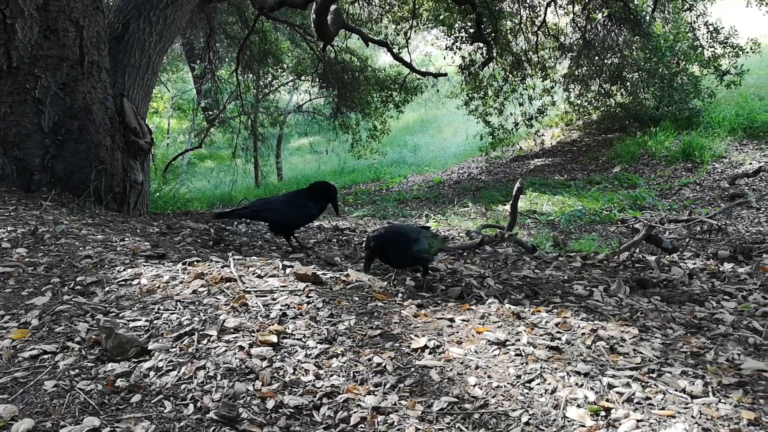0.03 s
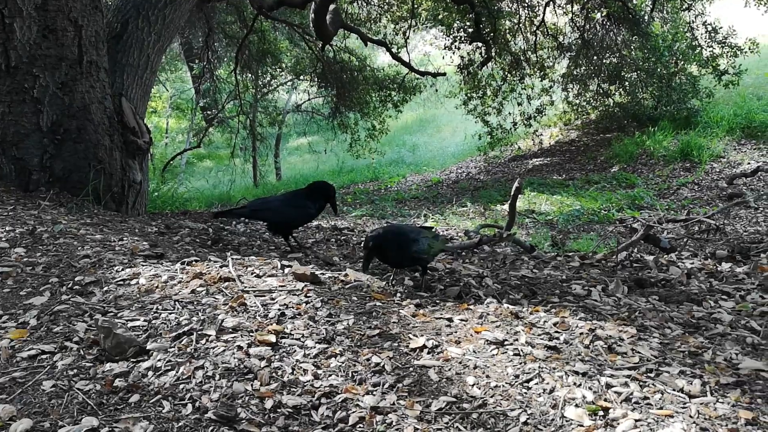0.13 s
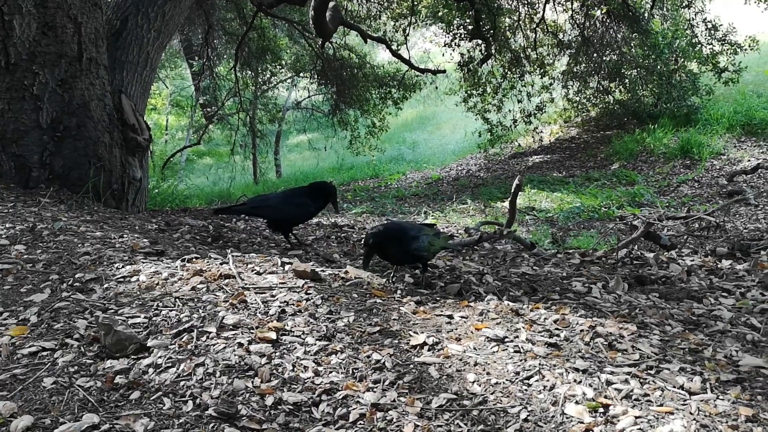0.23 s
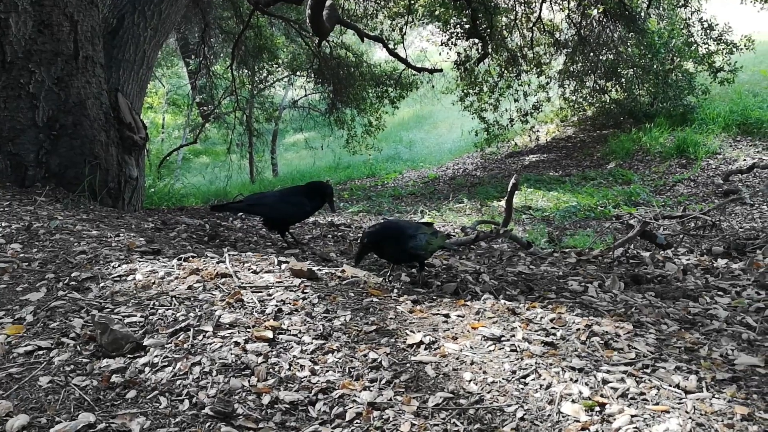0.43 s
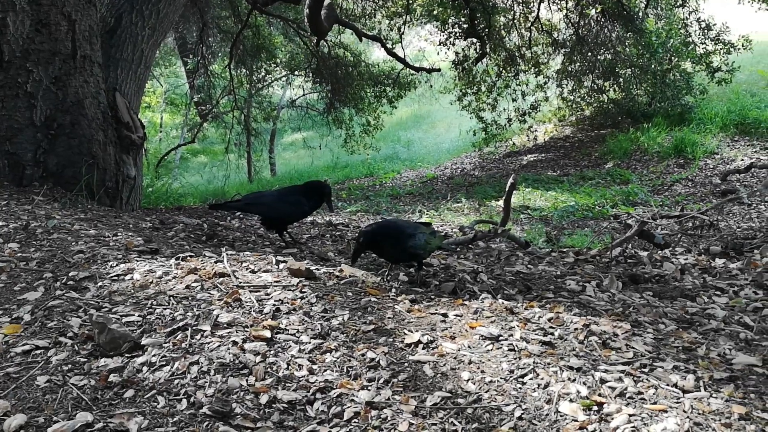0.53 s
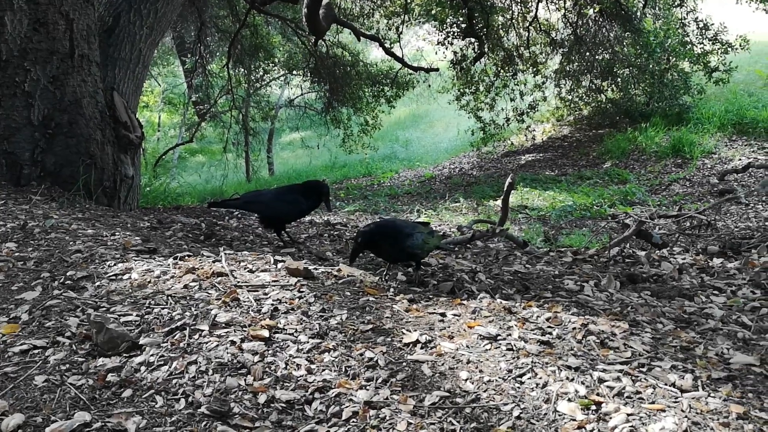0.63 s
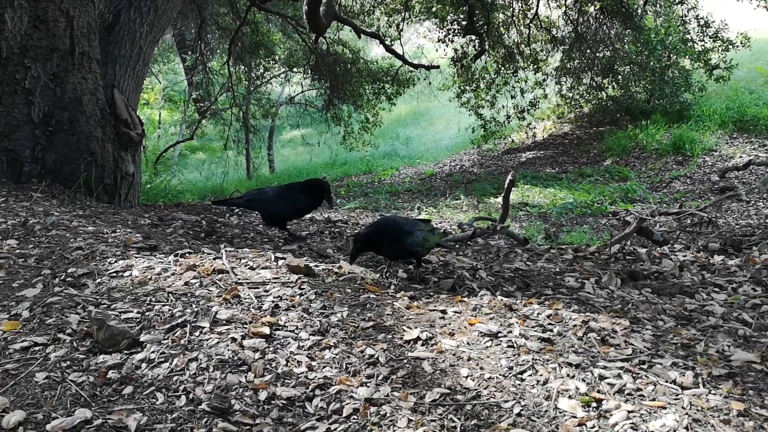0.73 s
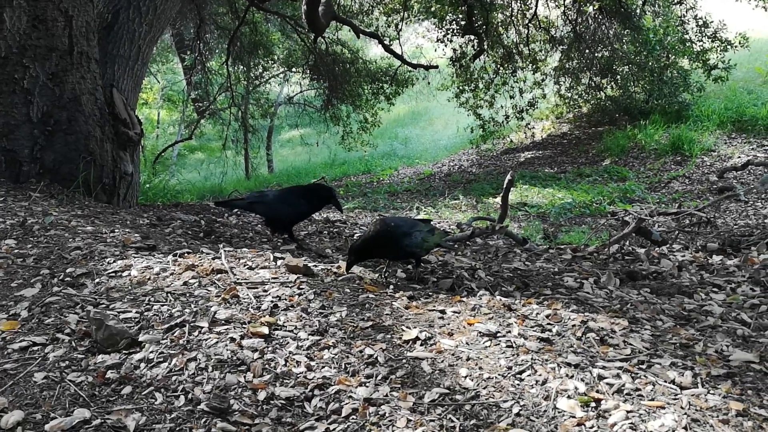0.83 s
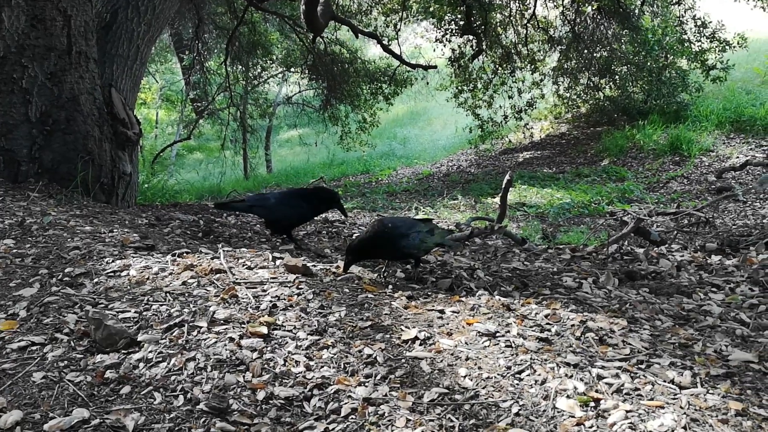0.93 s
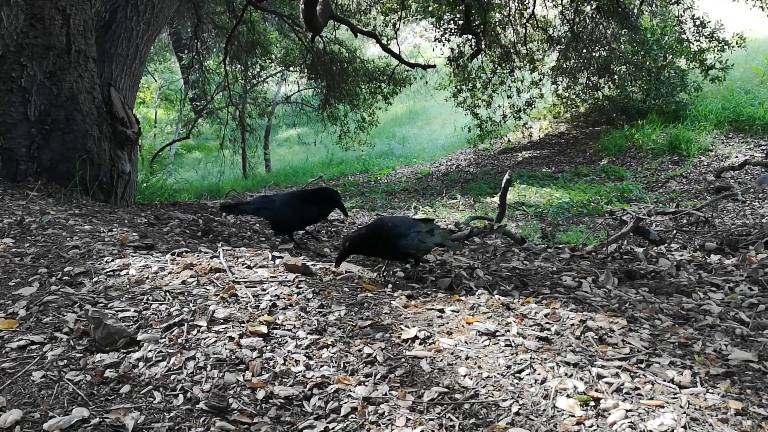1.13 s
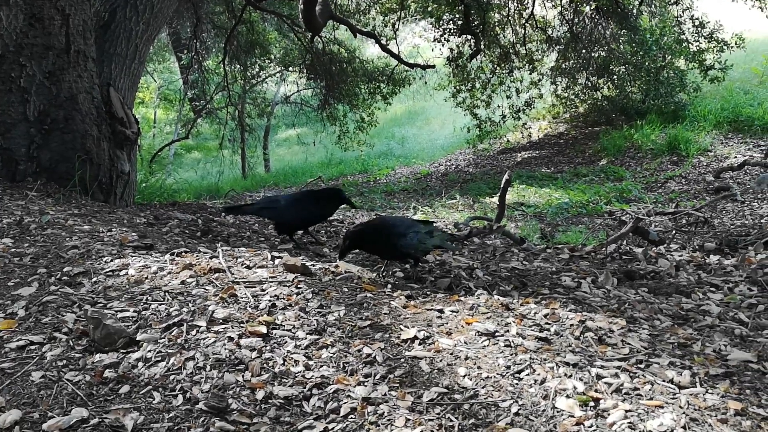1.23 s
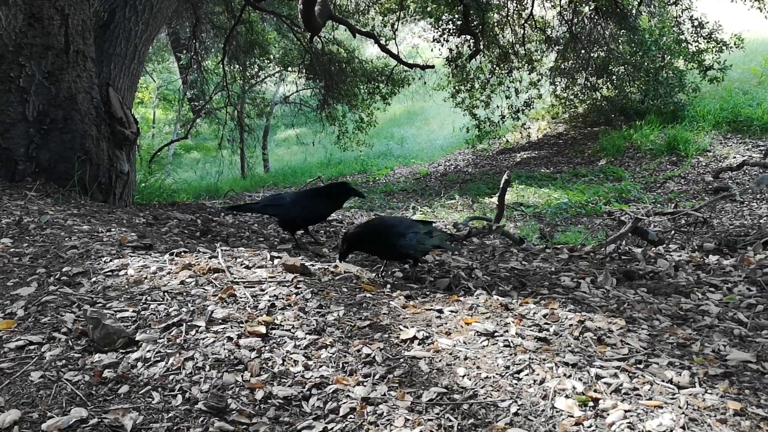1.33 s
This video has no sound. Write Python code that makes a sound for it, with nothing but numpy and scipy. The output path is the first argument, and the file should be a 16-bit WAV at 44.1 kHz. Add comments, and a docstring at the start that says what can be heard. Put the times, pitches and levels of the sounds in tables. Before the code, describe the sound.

Dry leaves rustle and crackle as crows forage, over a low wind rumble.

```python
"""First you hear open-air hiss and wind bumping the microphone.
At a cut, with a dull tick, this windy background switches to a quieter one.
Then come short, crackling rustles with sharp snaps: two crows search the dry leaves under a tree,
a few metres away. Their beaks and feet sweep the litter, crack single leaves and knock on twigs.
The ground and trees scatter these sounds, while a low wind rumble and a faint hum lie underneath."""
import sys
import numpy as np
from scipy import signal
from scipy.fft import rfft, irfft
from scipy.io import wavfile
from scipy.ndimage import uniform_filter1d

SR = 44100
rng = np.random.default_rng(int(sys.argv[2]) if len(sys.argv) > 2 else 0)


def generate_wav(signal):
    """Clip the signal to [-1, 1] and save it as 16-bit WAV at the path in sys.argv[1]."""
    frames = np.transpose(np.atleast_2d(signal))
    scaled = np.clip(frames, -1, 1) * 32767
    pcm = np.round(scaled).astype(np.int16)
    wavfile.write(sys.argv[1], SR, pcm)


N = 61739
TIME = np.arange(N) / SR

# strokes through the leaves (start/s, rise/s, fall/s, level/dB, crunch compared with rustle/dB)
STROKES = [(0.456, 0.0082, 0.012, -59, -14), (.520, 0.0012, 0.0056, -60, -28),
           (.575, 0.056, 0.026, -72.5, -14), (0.772, 0.028, 0.055, -64, -9.5),
           (.860, 0.0055, 0.028, -65.5, 0.5), (.945, 0.0073, 0.096, -73.5, -24),
           (1.094, 0.0026, .008, -65, -15.5), (1.172, 0.0027, 0.018, -59.5, -18),
           (1.176, 0.04, 0.034, -60.5, -15), (1.205, 0.028, 0.028, -62.5, -14)]
# tone of the rustle on top and of the crunch below (f/Hz, level/dB)
RUSTLE_TONE = [(400, -29), (1000, -20), (2400, -7.5), (3300, -19.5), (4400, -7), (6000, -7), (7400, -2),
               (8200, -2), (9500, -1.5), (10500, -10), (11700, -18), (14500, -32), (16000, -38.5)]
CRUNCH_TONE = [(400, -14), (1200, -7), (2000, -3), (2700, 4), (3400, -8), (4500, 2.5), (6000, -3),
               (11000, -30)]
def leaf_sweeps():
    """Leaves slide over each other with each stroke; deep strokes crunch the litter below."""
    top_power, deep_power = np.zeros((2, N))
    for start, rise, fall, db, crunch_db in STROKES:
        t = TIME - start
        stroke = amp(db) * np.clip(t / rise, 0, 1) * np.exp(-np.maximum(t - rise, 0) / fall)
        top_power += stroke ** 2
        deep_power += (stroke * amp(crunch_db)) ** 2
    return crackle(top_power, RUSTLE_TONE) + crackle(deep_power, CRUNCH_TONE)


def crackle(power, tone, clicks_per_s=5000, spread_db=4.2):
    """Rubbing leaves make thousands of tiny clicks of uneven size."""
    sizes = amp(spread_db * np.minimum(rng.exponential(1, (3, N)), 4))
    clicks = sizes * rng.choice([-1, 1], (3, N))
    clicks *= rng.random((3, N)) < clicks_per_s / SR
    streams = [colour(unit_level(row) * np.sqrt(power), tone) for row in clicks]
    return two_ears(*streams, shared=0.41)


# leaves cracking (t/s, level/dB, ring f/Hz, length/s, left minus right/dB, crack compared with ring/dB)
LEAF_SNAPS = [(.4706, -53.5, 8900, 0.00084, 9, -6), (.4712, -54.5, 6260, 0.0013, 7, -17),
              (0.4764, -56.5, 8200, 0.0009, -17, -20), (0.4808, -60, 7300, 0.0023, -14, -5),
              (0.4947, -68, 7870, 0.00089, -13, -8), (.5225, -65, 5700, 0.0027, -13, -10),
              (.5390, -66.5, 7940, 0.0015, -12, -3), (0.572, -55.5, 8200, 0.00079, 1.5, -12),
              (0.623, -62, 8300, 0.0034, -3, -3), (0.6405, -62, 7100, 0.0006, -9, -14),
              (.6930, -64, 7600, 0.0011, -6, -4), (0.7642, -58.5, 7540, 0.0031, -5, -2.5),
              (0.769, -60, 8700, 0.0012, -5, -2), (0.777, -62, 7160, 0.0013, -5, -3),
              (.790, -62, 7800, .0015, -6, -11), (0.7973, -55, 9450, 0.0018, 1, -6),
              (.8085, -54, 9700, 0.00086, 1, 14), (.8125, -62, 4970, 0.0015, -12, -9),
              (.8300, -43.5, 7800, 0.0013, -4, -5.5), (0.8313, -49, 9940, 0.0018, -4, -19),
              (0.8564, -57, 8870, 0.00063, 12, 12), (.8624, -43.5, 9400, 0.0011, -3.5, 4.5),
              (0.8647, -53, 7500, 0.0018, 3.5, -14), (0.951, -62, 4960, 0.0016, 4, -8),
              (1.098, -63, 8800, 0.0016, -9, -2), (1.1265, -62.5, 4460, 0.0015, -1.5, -3.5),
              (1.158, -67, 8500, .0008, 0, -6), (1.1686, -54, 6900, 0.00052, -2, -1),
              (1.1735, -56, 7100, 0.0019, -6, -16), (1.2125, -55, 7700, 0.0015, 5, -13),
              (1.2215, -52.5, 7500, 0.0011, -12, -21), (1.232, -54.5, 7800, .0015, -1, 3),
              (1.2455, -45.5, 8800, 0.00071, -3, -6), (1.2645, -49, 9400, 0.00047, -8, -6),
              (1.375, -65.5, 8500, 0.00077, 3, -10), (1.38, -60, 9520, 0.0022, -3.5, 8)]
# tone of a crack (f/Hz, level/dB)
CRACK_TONE = [(400, -23), (1000, -20), (1700, -15.5), (2500, -4), (3400, -15.5), (4600, -6), (6000, -3),
              (7500, 2.5), (9800, 3.5), (11700, -11), (14800, -9.5), (16000, -22)]
def leaf_snap(db, hz, length, pan_db, crack_db, rise_s=0.00048, ring_width_hz=920):
    """A dry leaf cracks: a quick burst of tiny breaks makes it ring."""
    t = TIME[:1024]
    shape = np.minimum(t / rise_s, 1) * np.exp(-(t / length) ** 2)
    bursts = two_ears(*rng.standard_normal((3, len(t))), shared=0.88) * shape
    crack = np.array([colour(burst, CRACK_TONE) for burst in bursts])
    leaf = np.exp(-np.pi * ring_width_hz * t) * np.sin(2 * np.pi * hz * t)
    ring = signal.fftconvolve(crack, leaf[None], axes=1)[:, :len(t)]
    sound = unit_level(unit_level(ring) + amp(crack_db) * unit_level(crack))
    return amp(db + left_right(pan_db)) * sound * np.sqrt(length * SR / len(t))


# knocks on twigs under the leaves (t/s, level/dB)
TWIG_KNOCKS = [(.8325, -57), (.8625, -57.5), (1.0975, -57.5), (1.1015, -60.5), (1.1685, -68),
               (1.2125, -58.5), (1.227, -59)]
# notes a twig rings with (f/Hz, level/dB, time to fade by 60 dB/s)
TWIG_NOTES = [(1890, 0, 0.011), (2670, 0, 0.0092), (3500, -2.5, 0.0061), (4700, -1.5, 0.0039)]
def twig_knock(db, contact_s=0.00058):
    """A beak or foot briefly scrapes a twig; each twig rings at a slightly different pitch."""
    t = TIME[:1024]
    tuning = 1 + 0.092 * rng.uniform(-0.72, 1)
    twig = sum(amp(note_db - 60 * t / fade_s) * np.sin(2 * np.pi * hz * tuning * t)
               for hz, note_db, fade_s in TWIG_NOTES)
    contact = rng.standard_normal((2, len(t))) * np.exp(-t / contact_s)
    knock = signal.fftconvolve(contact, twig[None], axes=1)[:, :len(t)]
    return amp(db) * unit_level(knock) * np.sqrt(contact_s * SR / len(t))


def echoes(x, fade_s):
    """Many small echoes blur into a tail that drops 60 dB in fade_s, different in each ear."""
    t = TIME[:SR // 2]
    tail = rng.standard_normal((2, len(t))) * amp(-60 * t / fade_s) * np.minimum(t / 0.00065, 1)
    return signal.fftconvolve(x, tail / np.linalg.norm(tail[0]), axes=1)[:, :N]


# wind hitting the microphone (t/s, level/dB, f/Hz, half-length/s)
WIND_BUMPS = [(0.2516, -30, 100, 0.0039), (0.4184, -40.5, 232, 0.0053), (0.4245, -24.5, 132.7, 0.0062),
              (0.439, -32.5, 73, 0.012)]
def wind_bumps(lag_s=0.00095):
    """Swirls of air hit one microphone opening, then the other: short, low thumps."""
    out = np.zeros((2, N))
    for when, db, hz, half_length in WIND_BUMPS:
        t = TIME - when + left_right(lag_s)
        out -= amp(db) * np.exp(-(t / half_length) ** 2) * np.cos(2 * np.pi * hz * t)
    return out


# tone of the rumble before and after the cut (f/Hz, level/dB)
RUMBLE_BEFORE = [(12, -27), (28, 7), (55, -0.5), (95, -6.5), (150, -23.5), (250, -26.5), (380, -35.5),
                 (900, -65)]
RUMBLE_AFTER = [(12, -38), (28, 1.5), (55, 4), (120, -5), (170, -16), (230, -23.5), (320, -28),
                (700, -50.5)]
# strength of that rumble over time (t/s, level/dB)
GUSTS_BEFORE = [(0, -52.5), (.12, -50), (.2, -50), (0.275, -39.5), (.33, -45), (.40, -40.5), (.46, -37)]
GUSTS_AFTER = [(.46, -55.5), (.68, -56.5), (.79, -53), (.92, -55.5), (1.03, -56), (1.15, -54.5),
               (1.252, -50), (1.33, -56), (1.4, -53.5)]
def wind_rumble(tone, gusts):
    """Churning air rumbles, louder with each gust."""
    noise = air_noise(tone)
    steady = noise / np.sqrt(uniform_filter1d((noise ** 2).mean(0), size=3500))
    return steady * amp(np.interp(TIME, *np.transpose(gusts)))


# tone of the hiss before and after the cut (f/Hz, level/dB)
HISS_BEFORE = [(100, 19), (200, 13), (270, 8.5), (400, 2), (600, -1), (930, 4), (1200, -1.5), (1700, 1),
               (2500, -4.5), (3300, -11), (5000, -12.5), (7600, -11), (8500, -19), (16000, -32.5)]
HISS_AFTER = [(250, 5), (400, -1.5), (600, -3.5), (1000, 0.5), (1400, -2.5), (1900, 2), (2600, -1),
              (3400, -7), (5000, -7.5), (6500, -12), (9300, -8.5), (11500, -30), (16000, -28)]
def open_air(cut_at_s=0.4594, fade_s=0.003, tick_db=-37.5, tick_s=0.0022):
    """At a cut, with a dull tick, the windy background switches to a quieter one."""
    before = amp(-57) * air_noise(HISS_BEFORE) + wind_rumble(RUMBLE_BEFORE, GUSTS_BEFORE) + wind_bumps()
    after = amp(-69.5) * air_noise(HISS_AFTER) + wind_rumble(RUMBLE_AFTER, GUSTS_AFTER)
    after_cut_share = .5 + .5 * np.tanh((TIME - cut_at_s) / fade_s)
    out = before * (1 - after_cut_share) + after * after_cut_share
    add(out, cut_at_s, amp(tick_db) * np.exp(-TIME / tick_s))
    return out


# how alike the air sounds in the two ears (f/Hz, likeness from 0 to 1)
EAR_LIKENESS = [(30, 1), (130, 0.98), (290, 0.22), (640, 0), (1400, 0.062), (3000, 0), (16000, 0)]
def air_noise(tone):
    """Steady noise whose deep bass is alike in both ears."""
    hz = np.fft.rfftfreq(N, 1 / SR)
    mid, side = np.exp(2j * np.pi * rng.random((2, len(hz))))
    likeness = value_at(EAR_LIKENESS, hz)
    mid *= np.sqrt(1 + likeness)
    side *= np.sqrt(1 - likeness)
    spectrum = np.array([mid + side, mid - side]) * amp(value_at(tone, hz))
    return unit_level(irfft(spectrum, N))


# humming notes (start/s, level/dB, f/Hz, fade/dB per second)
HUM_NOTES = [(0, -55.5, 206, 61), (.46, -67.5, 213.3, 16)]
def hum(waver_hz=8):
    """A faint, low hum wavers and dies away."""
    out = np.zeros(N)
    for start, db, hz, fade in HUM_NOTES:
        pitch = hz + waver_hz * unit_level(uniform_filter1d(rng.standard_normal(N), size=1500))
        add(out, start, np.sin(2 * np.pi * np.cumsum(pitch) / SR) * amp(db - fade * TIME))
    return out


def amp(db):
    """Turns decibels into a multiplier."""
    return 10 ** (np.asarray(db) / 20)


def unit_level(x):
    """Scales a sound to an average (rms) level of 1."""
    return x / np.sqrt(np.mean(x ** 2) + 1e-20)


def left_right(difference):
    """Splits a difference: half up on the left, half down on the right."""
    return difference * np.array([[.5], [-.5]])


def two_ears(both, left, right, shared):
    """Blends a sound both ears share with each ear's own."""
    return np.sqrt(shared) * both + np.sqrt(1 - shared) * np.array([left, right])


def value_at(table, hz):
    """Reads between a table's rows, along a log-frequency scale."""
    row_hz, values = np.transpose(table)
    return np.interp(np.log(hz + 1), np.log(row_hz), values)


def add(mix, start_s, sound):
    """Mixes a sound in at start_s."""
    part = mix[..., round(start_s * SR):][..., :sound.shape[-1]]
    part += sound[..., :part.shape[-1]]


def colour(x, tone):
    """Gives a sound a tone, using a filter that rings only after each click."""
    log_gain = np.log(amp(value_at(tone, abs(np.fft.fftfreq(2048, 1 / SR)))))
    taps = np.fft.ifft(np.exp(np.conj(signal.hilbert(log_gain)))).real[:512]
    return signal.fftconvolve(x, taps / np.linalg.norm(taps))[:len(x)]


def scene():
    """The crows work slightly to the right; ground and trees scatter their sound."""
    crows = leaf_sweeps()
    for when, *snap in LEAF_SNAPS:
        add(crows, when, leaf_snap(*snap))
    for when, db in TWIG_KNOCKS:
        add(crows, when, twig_knock(db))
    crows[0] = np.roll(crows[0], 4)  # the left ear hears them 4 samples later
    ground = amp(-9.5) * echoes(crows, fade_s=0.022)
    trees = amp(-13.5) * echoes(crows, fade_s=0.42)
    return crows + ground + trees + open_air() + hum()


# balance of the two microphone openings (f/Hz, left minus right/dB)
MIC_BALANCE = [(100, 0.5), (250, 0.5), (500, 0), (1000, -0.5), (2200, -2), (4000, 0.5), (6000, -0.5),
               (7600, 8), (8600, 0.5), (9600, -1.5), (10800, -2), (12500, 3), (16000, 2)]
def record(dry, top_hz=16000):
    """Each microphone opening has its own tone; the highest treble is cut off."""
    balance_db = value_at(MIC_BALANCE, np.fft.rfftfreq(N, 1 / SR))
    heard = irfft(rfft(dry) * amp(left_right(balance_db)), N)
    treble_cut = signal.firwin(511, top_hz, window=("kaiser", 9), fs=SR)
    return signal.oaconvolve(heard, treble_cut[None], "same")


dry = scene()
out = record(dry)
generate_wav(out)
```